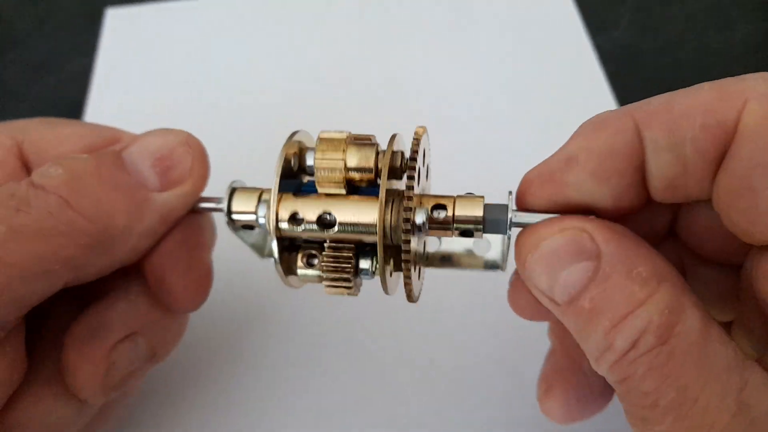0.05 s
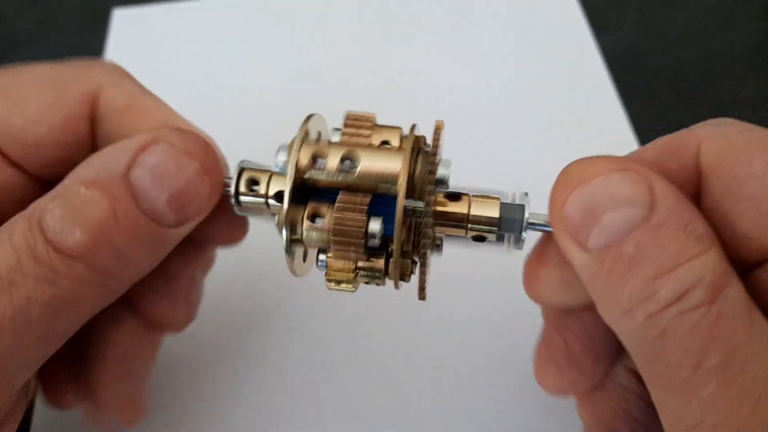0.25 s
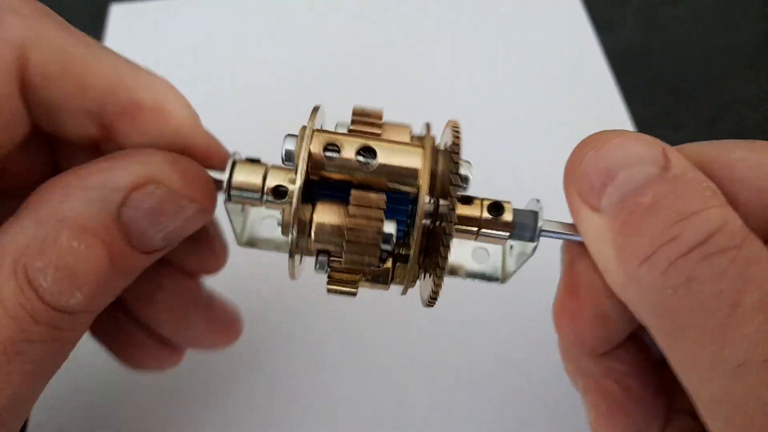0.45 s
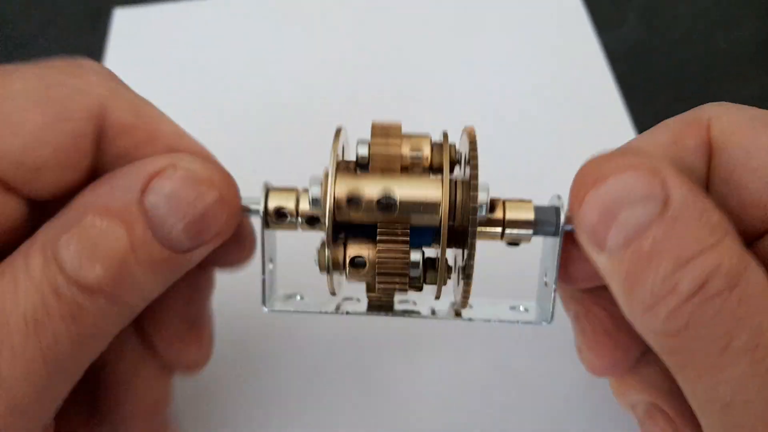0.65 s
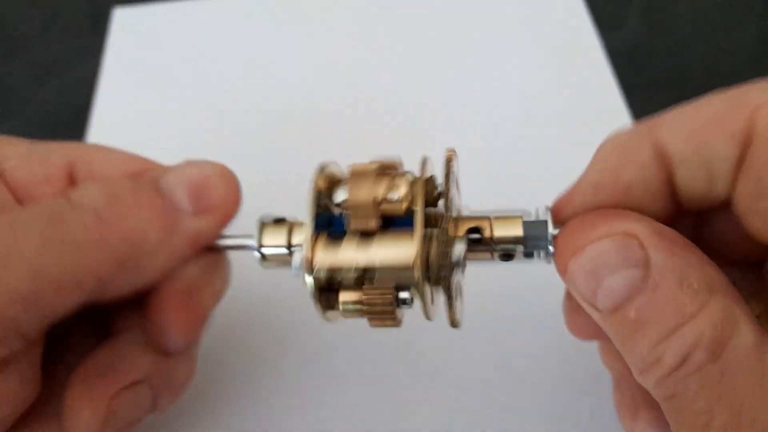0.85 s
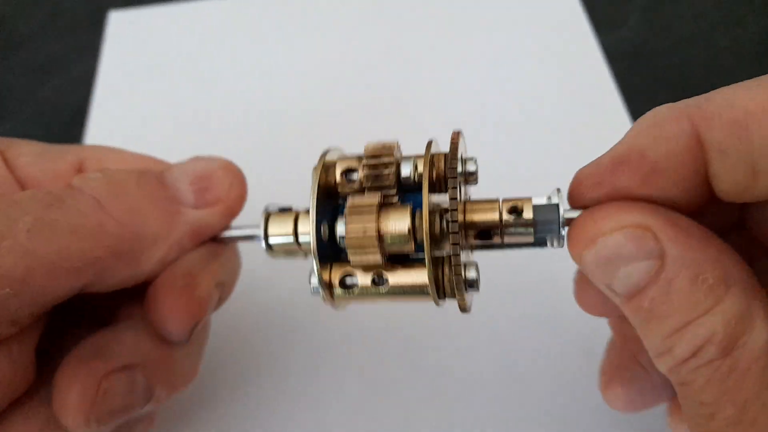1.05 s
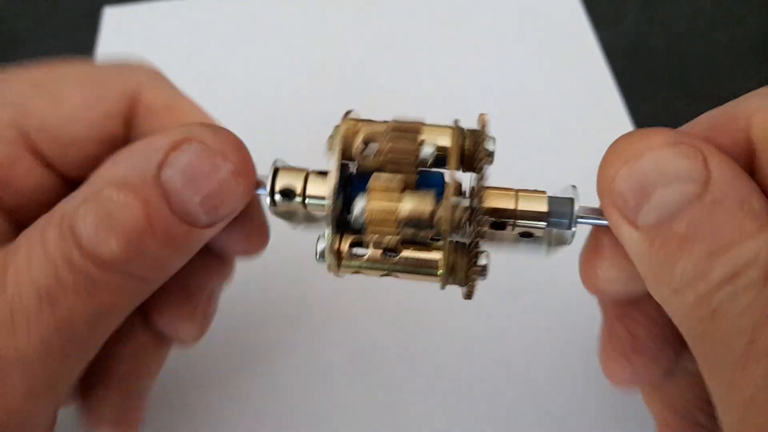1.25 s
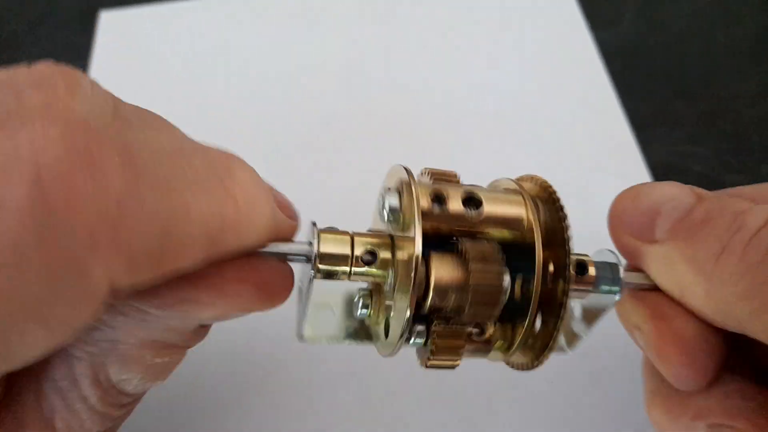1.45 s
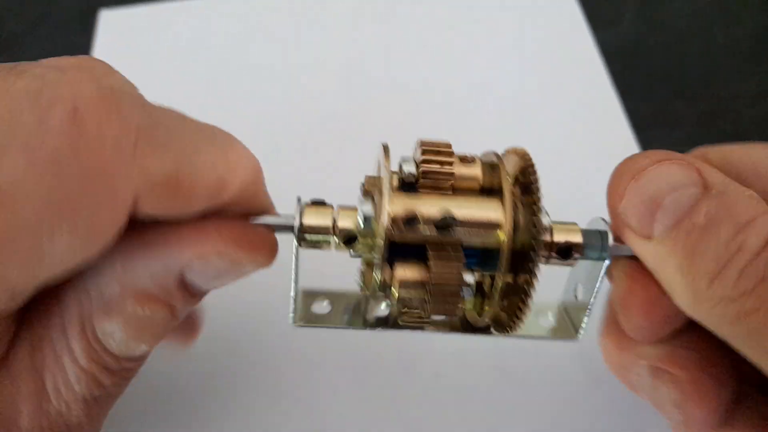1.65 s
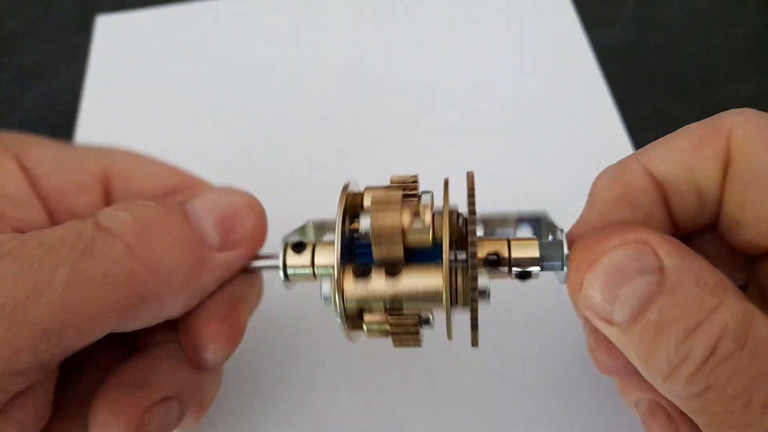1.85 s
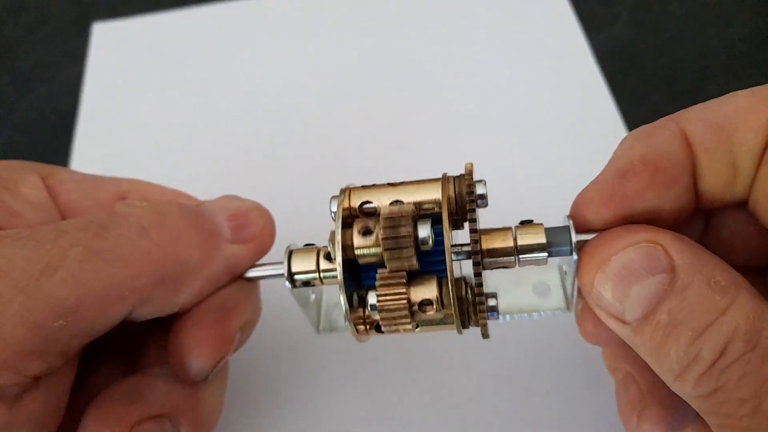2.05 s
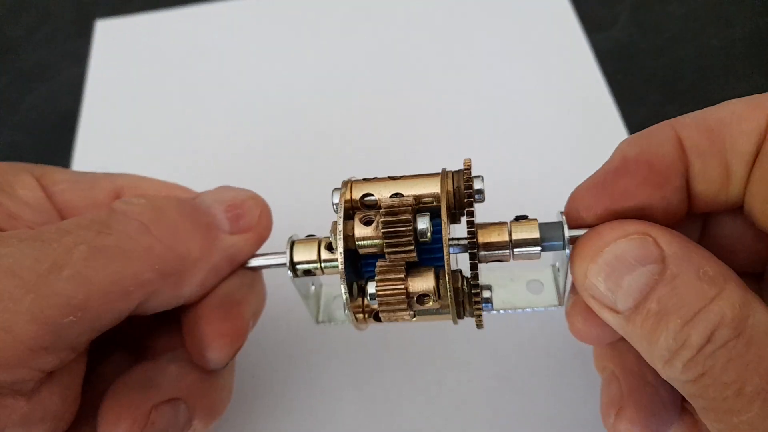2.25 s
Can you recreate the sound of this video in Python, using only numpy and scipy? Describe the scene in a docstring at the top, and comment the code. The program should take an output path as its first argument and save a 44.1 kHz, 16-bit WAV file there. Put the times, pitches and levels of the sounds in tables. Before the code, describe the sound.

Small brass gears rattle and click in short bursts as hands turn them.

```python
"""A faint hum fills a quiet room. From the start, two hands turn a small brass gear assembly close by,
in short bursts: loose teeth rattle while the wheels run and clack where the play is taken up. Contacts
ring the wheels (5-7 kHz) and, when hard, the teeth (near 15 kHz); the cage knocks dully along.
From 0.4 s, slipping tooth tips ping. At 1.3 s a freed wheel rings on; soft finger rubs follow.
The last clack falls just before 2.2 s."""
import sys
import numpy as np
from scipy import signal
from scipy.fft import rfft, irfft
from scipy.io import wavfile
from scipy.ndimage import uniform_filter1d

SR = 44100
rng = np.random.default_rng(int(sys.argv[2]) if len(sys.argv) > 2 else 0)


def write(x):
    x = np.atleast_2d(x).T
    wavfile.write(sys.argv[1], SR, np.round(np.clip(x, -1, 1) * 32767).astype(np.int16))


N = 101429
TIME = np.arange(N) / SR
BASS_PAN_DB, WHEEL_PAN_DB, TOOTH_PAN_DB = -3.5, -9.5, -2


def from_db(db):
    """Decibels to gain."""
    return 10 ** (np.asarray(db) / 20)


def rms_one(x):
    """Scale each channel to rms 1."""
    return x / np.sqrt(np.mean(x ** 2, axis=-1, keepdims=True) + 1e-20)


def pan(left_over_right_db):
    """Stereo gains of mean power 1."""
    gains = from_db(np.array([[left_over_right_db / 2], [-left_over_right_db / 2]]))
    return gains / np.sqrt(np.mean(gains ** 2))


def noise_pair(size, correlation=0.3):
    """Partly correlated stereo noise."""
    common = np.sqrt(correlation) * rng.standard_normal(size)
    return common + np.sqrt(1 - correlation) * rng.standard_normal((2, size))


def resonate(x, hz, width_hz):
    """One resonance, peak gain 1."""
    r = np.exp(-np.pi * width_hz / SR)
    feedback = [1, -2 * r * np.cos(2 * np.pi * hz / SR), r * r]
    return signal.lfilter(np.array([1, 0, -1]) * (1 - r * r) / 2, feedback, x + 1e-18)


def colour(x, spectrum):
    """Shape by a smooth spectrum of mean power gain 1."""
    hz, db = np.transpose(spectrum)
    bins_hz = np.maximum(np.fft.rfftfreq(N, 1 / SR), 1)
    gain = rms_one(from_db(np.interp(np.log(bins_hz), np.log(hz), db)))
    return irfft(rfft(x) * gain, N)


# air noise spectrum: f/Hz, relative level/dB
AIR_SPECTRUM = [(20, -40), (35, -18.5), (58, -7.5), (120, -5.5), (215, -8), (270, 1), (340, 2),
                (460, -12.5), (700, -14.5), (1200, -20), (2300, -18.5), (3500, -27.5), (6000, -23),
                (8300, -35), (16000, -30.5)]


def room_air(level_db=-54.5, alike_below_hz=670):
    """Soft air noise, alike on both sides in the bass."""
    share = 1 / (1 + (np.fft.rfftfreq(N, 1 / SR) / alike_below_hz) ** 2)
    common = np.sqrt(share) * rfft(rng.standard_normal(N))
    separate = np.sqrt(1 - share) * rfft(rng.standard_normal((2, N)))
    return from_db(level_db) * pan(BASS_PAN_DB) * colour(irfft(common + separate, N), AIR_SPECTRUM)


# hum tones: f/Hz, level/dB
HUM_TONES = [(97, -70.5), (183.5, -58), (259, -66.5), (295, -61.5), (355.5, -63.5), (517, -74)]


def room_hum(width_hz=19.7, waver=0.64):
    """Steady tones, each wavering with a narrow skirt of noise."""
    hum = np.zeros(N)
    for hz, db in HUM_TONES:
        skirt = resonate(resonate(rng.standard_normal(N + SR), hz, width_hz), hz, width_hz)[SR:]
        tone = np.sqrt(2) * np.sin(2 * np.pi * (hz * TIME + rng.random()))
        hum += from_db(db) * rms_one(tone + waver * rms_one(skirt))
    return pan(BASS_PAN_DB) * hum


def echoes(x, t60_s):
    """Diffuse decaying reflections, different on each side."""
    t = np.arange(SR // 2) / SR
    tail = rng.standard_normal((2, len(t))) * from_db(-60 * t / t60_s) * (t > .003)
    return signal.fftconvolve(x, rms_one(tail) / np.sqrt(len(t)), axes=1)[:, :N]


# handling rumble envelope: t/s, level/dB
RUMBLE_ENVELOPE = [(0, -45.5), (0.08, -86), (0.3, -54.5), (0.46, -56.5), (0.58, -72), (0.72, -58),
                   (0.85, -51), (1.05, -71), (1.17, -62), (1.27, -62), (1.56, -58.5), (1.68, -69),
                   (1.83, -78), (1.9, -66), (2.3, -68)]


def handling_rumble(hz=92.6, width_hz=127):
    """Low noise of the hands on the assembly."""
    rumble = rms_one(resonate(resonate(noise_pair(N), hz, width_hz), hz, width_hz))
    return from_db(np.interp(TIME, *np.transpose(RUMBLE_ENVELOPE))) * rumble * pan(BASS_PAN_DB)


# finger rubs: t/s, f/Hz, level/dB
FINGER_RUBS = [(1.462, 1170, -49.5), (1.46, 2230, -50), (1.506, 2260, -53), (1.597, 2300, -53),
               (2.142, 2230, -61)]


def finger_rubs(sigma_s=0.0082, width_hz=420):
    """Fingers rub the axle: brief swells of band noise."""
    rubs = np.zeros((2, N))
    for at_s, hz, db in FINGER_RUBS:
        swell = np.exp(-.5 * ((TIME - at_s) / sigma_s) ** 2)
        rubs += from_db(db) * swell * rms_one(resonate(noise_pair(N), hz, width_hz))
    return rubs


# free wheel modes: f/Hz, t60/s, level/dB
FREE_MODES = [(6850, 0.15, -33.5), (10400, 0.29, -55), (11800, 0.3, -46), (14600, 0.24, -55)]


def free_wheel(freed_at_s=1.3):
    """A wheel out of mesh rings on faintly."""
    age_s = np.maximum(TIME - freed_at_s, 0)
    return sum(from_db(db - 60 * age_s / t60_s) * np.sin(2 * np.pi * hz * age_s)
               for hz, t60_s, db in FREE_MODES)


# cage knock spectrum: f/Hz, relative level/dB
CAGE_SPECTRUM = [(60, -9), (110, 4), (300, -2), (600, 1), (1400, -2), (2300, 3.5), (2900, -1.5), (3400, 7),
                 (4000, -2), (8000, -4.5), (16000, -0.5)]


def cage(wheels, gain_db=-7.5, compression=0.7):
    """The cage knocks dully in step with the wheels, with softer peaks."""
    envelope = np.sqrt(np.abs(uniform_filter1d(np.mean(wheels ** 2, axis=0), size=40)))
    force = wheels.std() * (envelope / wheels.std()) ** compression
    return from_db(gain_db) * pan(-0.5) * colour(force * noise_pair(N), CAGE_SPECTRUM)


def wander(size, mesh_shift_s=.02):
    """Random glide, spread about 1, as the mesh shifts."""
    steps = np.arange(size) / SR / mesh_shift_s
    values = rng.standard_normal(int(steps[-1]) + 2)
    return np.interp(steps, np.arange(len(values)), np.clip(values, -2, 2))


def ring(force, modes, spread_db=3.5):
    """Parallel modes whose strengths wander as the contact point moves; rms 1."""
    ringing = sum(from_db(db + spread_db * wander(force.shape[-1])) * resonate(force, hz, width_hz)
                  for hz, width_hz, db in modes)
    # little radiates beyond the outer modes
    edges_hz = [modes[0][0] * 0.97, min(modes[-1][0] * 1.099, SR * .45)]
    band = signal.butter(2, edges_hz, "band", fs=SR, output="sos").repeat(2, axis=0)
    return rms_one(signal.sosfilt(band, ringing))


# rattle envelopes, one list per finger push: t/s, level/dB
FINGER_PUSHES = [
    [(0.0, -37.5), (0.025, -45.5)],
    [(0.19, -69), (0.22, -30), (0.265, -38.5), (0.285, -24), (0.312, -25.5), (0.345, -53)],
    [(0.35, -37.5), (0.385, -29.5), (0.41, -31.5), (0.44, -58), (0.465, -49.5), (0.48, -34), (0.495, -46)],
    [(0.632, -37.5), (0.662, -58), (0.69, -32.5), (0.725, -35.5), (0.78, -27.5), (0.81, -27.5),
     (0.85, -45.5)],
    [(0.88, -46.5), (0.905, -51), (0.918, -30), (0.942, -42.5), (0.965, -41), (1.0, -53)],
    [(1.185, -57), (1.205, -44), (1.24, -38.5), (1.27, -30), (1.312, -30), (1.345, -48)],
    [(1.355, -48.5), (1.395, -33.5), (1.418, -38), (1.43, -28.5), (1.445, -41)],
    [(1.533, -40), (1.543, -34.5), (1.555, -25), (1.585, -46), (1.608, -31.5), (1.628, -71)],
    [(1.719, -46), (1.742, -52.5), (1.756, -38.5), (1.795, -36), (1.812, -56)],
    [(1.815, -43), (1.825, -31.5), (1.855, -37.5), (1.88, -33.5), (1.93, -26.5), (1.945, -45)],
    [(1.955, -42), (1.985, -39), (2.005, -48.5), (2.036, -25.5), (2.052, -46.5), (2.075, -44.5)],
]


def turning_effort():
    """The fingers drive the gears in short pushes."""
    return sum(from_db(np.interp(TIME, *np.transpose(push), left=-np.inf, right=-np.inf))
               for push in FINGER_PUSHES)


# wheel resonances: f/Hz, width/Hz, relative level/dB
WHEEL_MODES = [(4500, 73, -6), (5192, 103, 2.5), (5386, 125, 3), (5730, 190, -3), (6003, 235, 2),
               (6287, 240, 3), (6710, 330, 5), (7010, 88, -6)]
# tooth resonances: f/Hz, width/Hz, relative level/dB
TOOTH_MODES = [(9170, 1300, -4.5), (11700, 2900, -9.5), (13700, 1000, -2), (14800, 570, 5.5),
               (15670, 460, -13.5)]


def rattle(effort, contacts_per_s=420, jitter=.5, spread_db=3.5, contact_s=.0007, sliding=0.32, snap=1.6):
    """Running teeth meet unevenly and slide in between; returns wheel and tooth sound."""
    gap, strength = np.clip(rng.standard_normal((4000, 2)), -2, 2).T
    at = (np.cumsum(np.exp(jitter * gap)) / contacts_per_s * SR).astype(int)
    hits = np.bincount(at[at < N], from_db(spread_db * strength[at < N]), N)
    force = signal.lfilter([1], [1, -np.exp(-1 / (contact_s * SR))], hits) + sliding
    wheels = from_db(-2.5) * pan(WHEEL_PAN_DB) * ring(force * noise_pair(N) + snap * hits, WHEEL_MODES)
    teeth = from_db(-6.5) * pan(TOOTH_PAN_DB) * ring(force * noise_pair(N), TOOTH_MODES)
    mean_effort = from_db(-35.5)
    tooth_effort = mean_effort * (effort / mean_effort) ** 1.44  # harder is brighter
    return effort * wheels, tooth_effort * teeth


def contact(at_s, modes, chatter_s=0.00077, rise_s=0.00048, length_s=.016, detune_hz=70):
    """Force builds, then dies in micro-bounces; each contact rings at a slightly different pitch."""
    t = np.arange(int(length_s * SR)) / SR
    force = noise_pair(len(t)) * np.exp(-t / chatter_s) * (1 - np.exp(-t / rise_s)) ** 2
    detuned = [(hz + detune_hz * rng.normal(), width_hz, db) for hz, width_hz, db in modes]
    strike = ring(force, detuned) * np.sqrt(.0023 / length_s)  # energy of 2.3 ms at rms 1
    return np.pad(strike, [(0, 0), (int(at_s * SR), N)])[:, :N]


# tooth slips: t/s, level/dB
SLIPS = [(0.4145, -15.5), (0.4722, -25.5), (0.9334, -12.5), (1.222, -28.5), (1.5211, -20), (1.7301, -27.5),
         (1.9279, -12), (1.9314, -17), (2.101, -39.5)]
# tooth tip resonances: f/Hz, width/Hz, relative level/dB
TIP_MODES = [(10650, 5100, -12), (13400, 380, -38), (14200, 260, 3), (15950, 460, 11)]


def pings():
    """A tooth tip slips off its neighbour with a bright ping; returns wheel and tooth sound."""
    wheels, teeth = np.zeros((2, 2, N))
    for at_s, db in SLIPS:
        wheels += from_db(db - 9.5) * contact(at_s, WHEEL_MODES)
        teeth += from_db(db) * contact(at_s, TIP_MODES, chatter_s=0.0024)
    return pan(WHEEL_PAN_DB) * wheels, pan(-6.5) * teeth


# single clacks: t/s, wheel level/dB, tooth level/dB
CLACKS = [(0.138, -46, -46.5), (0.1766, -39, -47), (0.1857, -32.5, -34), (0.201, -35, -43),
          (0.2106, -29, -31), (0.2442, -35, -48), (0.2544, -23.5, -38), (0.2769, -26.5, -45),
          (0.2844, -14, -24), (0.3104, -19.5, -24.5), (0.3328, -30, -35), (0.3541, -46, -35),
          (0.3805, -35, -49), (0.6247, -45, -46), (0.6357, -40.5, -45), (0.6518, -40, -35.5),
          (0.672, -30.5, -33), (0.686, -33.5, -25), (0.693, -44, -34), (0.7046, -35, -29),
          (0.718, -45, -36), (0.7253, -30, -29), (0.7406, -34.5, -42), (0.7763, -27.5, -27),
          (0.79, -22, -23), (0.8065, -25, -28), (0.8212, -40, -28), (0.912, -29, -44), (0.932, -34, -36.5),
          (0.94, -21, -29), (0.9461, -26.5, -52), (0.9578, -29, -41), (0.9828, -36.5, -42.5),
          (1.152, -47.5, -46.5), (1.2006, -38, -39), (1.2247, -34, -31), (1.235, -33, -40),
          (1.251, -29, -26), (1.256, -27, -22), (1.2615, -25, -24.5), (1.285, -24, -27),
          (1.3029, -29.5, -29.5), (1.3171, -22.5, -39), (1.3251, -25, -23), (1.358, -36.5, -39),
          (1.3627, -37, -38), (1.3812, -32, -36), (1.3943, -30.5, -44), (1.3982, -25.5, -34),
          (1.421, -23.5, -35), (1.5458, -28.5, -26), (1.5994, -29, -41), (1.6136, -34, -44),
          (1.7104, -43, -65), (1.7574, -29.5, -45), (1.7667, -30.5, -25.5), (1.7785, -33, -37),
          (1.7855, -37, -44), (1.819, -32, -33), (1.8412, -32, -54), (1.8695, -21.5, -26.5),
          (1.8782, -29, -35), (1.8887, -24, -47), (1.9002, -23, -25), (1.94, -39, -31.5),
          (1.9731, -34.5, -37), (1.9782, -30, -34), (1.9892, -24, -31), (2.0153, -53, -49),
          (2.0364, -27.5, -47), (2.1563, -45.5, -44), (2.1683, -37.5, -42.5)]


def clacks():
    """Teeth collide as the play is taken up; returns wheel and tooth sound."""
    wheels, teeth = np.zeros((2, 2, N))
    for at_s, wheel_db, tooth_db in CLACKS:
        wheels += from_db(wheel_db + 0.2) * contact(at_s, WHEEL_MODES)
        teeth += from_db(tooth_db) * contact(at_s, TOOTH_MODES, chatter_s=.0012)
    return pan(WHEEL_PAN_DB) * wheels, pan(TOOTH_PAN_DB) * teeth


def scene(left_lead_s=.00018):
    """Gears, table and room reflections, hands, air and hum."""
    struck_wheels, struck_teeth = np.add(clacks(), pings())
    running_wheels, running_teeth = rattle(turning_effort())
    cage_drive = running_wheels + from_db(-11.5) * struck_wheels  # light clacks shake it less
    wheels = struck_wheels + running_wheels + cage(cage_drive)
    teeth = struck_teeth + running_teeth
    direct = wheels + teeth + free_wheel()
    direct[1] = np.interp(TIME - np.round(left_lead_s * SR) / SR, TIME, direct[1])
    room_send = (from_db(-15) * wheels + from_db(-13.5) * teeth).mean(axis=0, keepdims=True)
    table = from_db(-14.5) * echoes(direct, t60_s=0.021)
    room = echoes(room_send, t60_s=0.32)
    return direct + table + room + handling_rumble() + finger_rubs() + room_air() + room_hum()


def record(dry):
    """Steep low-pass at 15.75 kHz."""
    return signal.sosfilt(signal.ellip(10, .2, 70, 15750, fs=SR, output="sos"), dry)


dry = scene()
out = record(dry)
write(out)
```